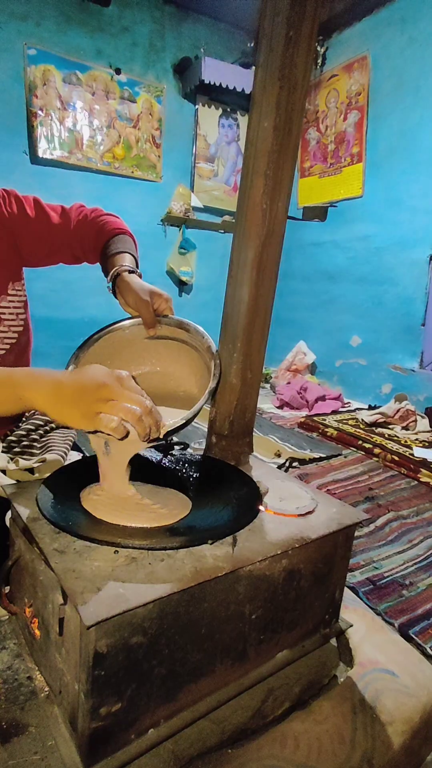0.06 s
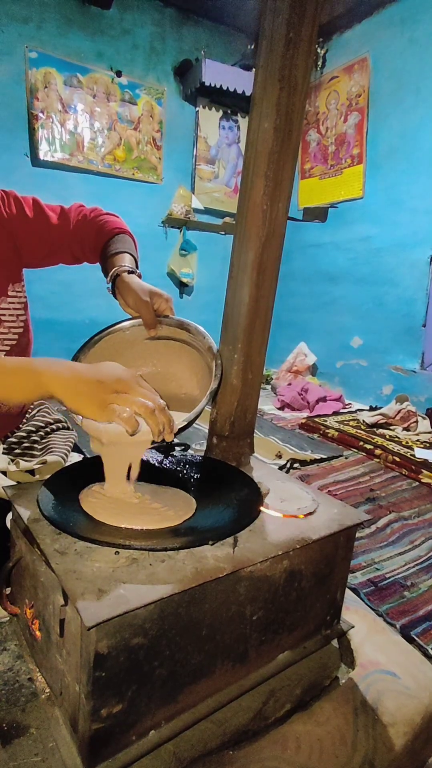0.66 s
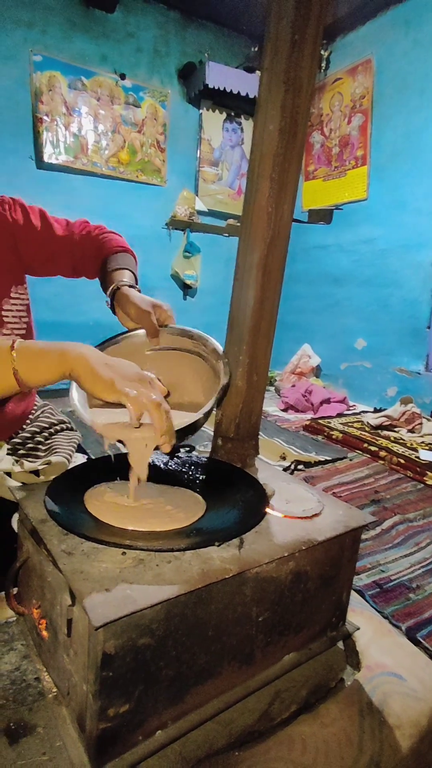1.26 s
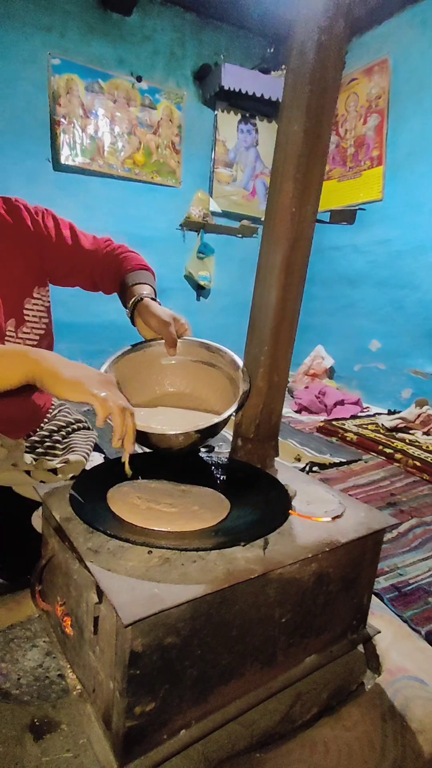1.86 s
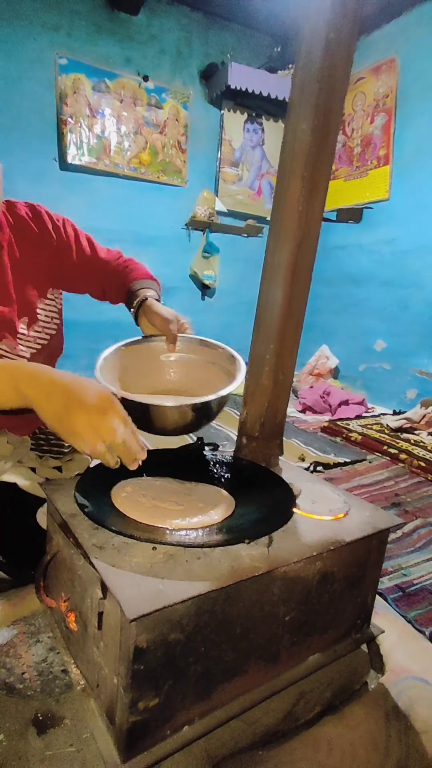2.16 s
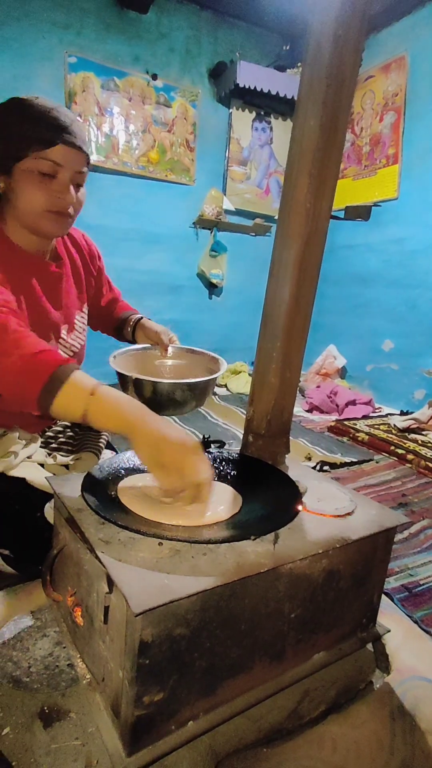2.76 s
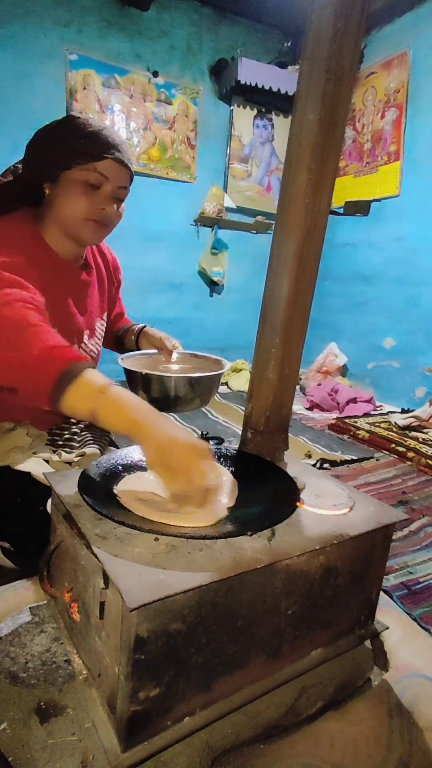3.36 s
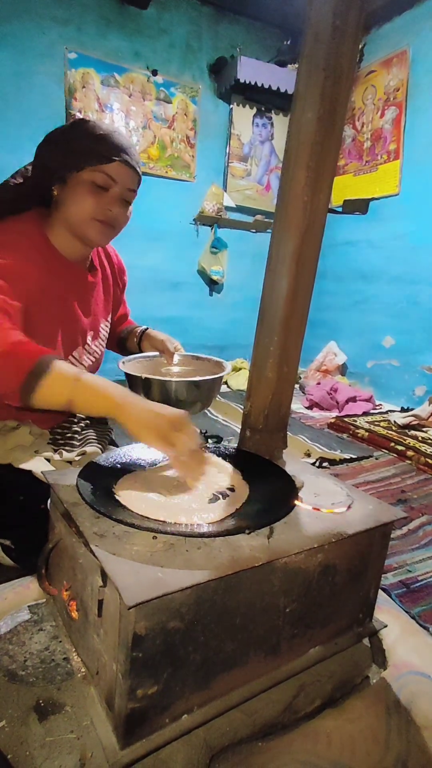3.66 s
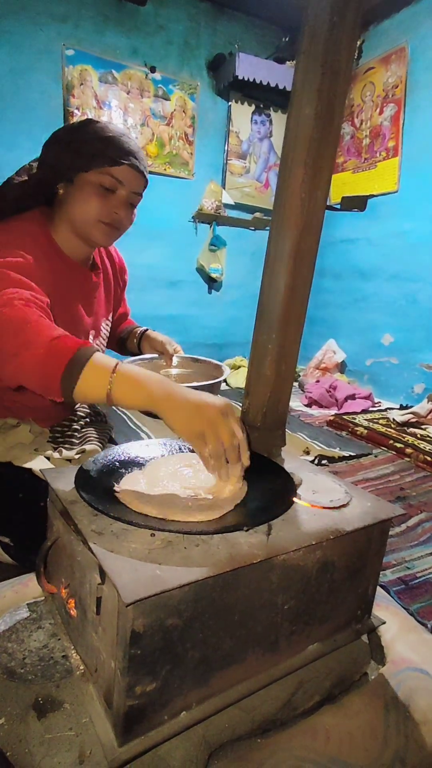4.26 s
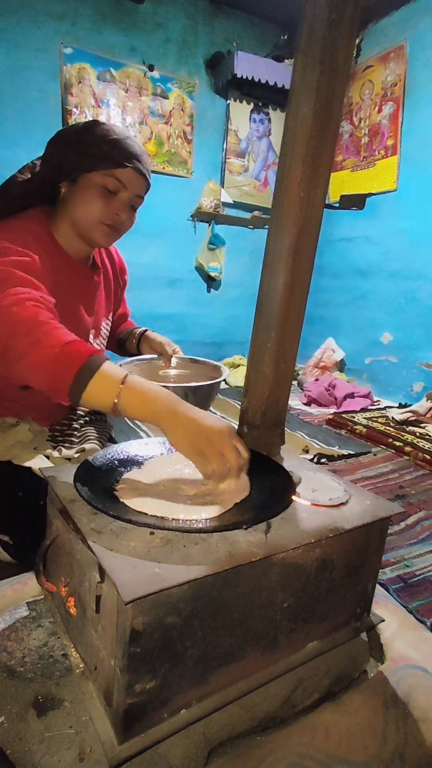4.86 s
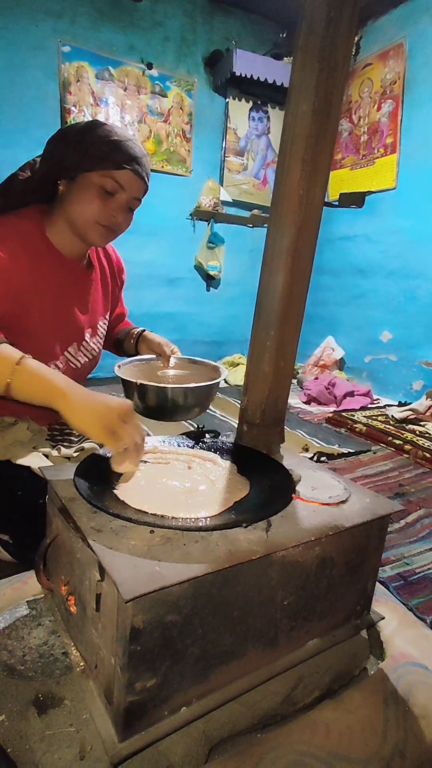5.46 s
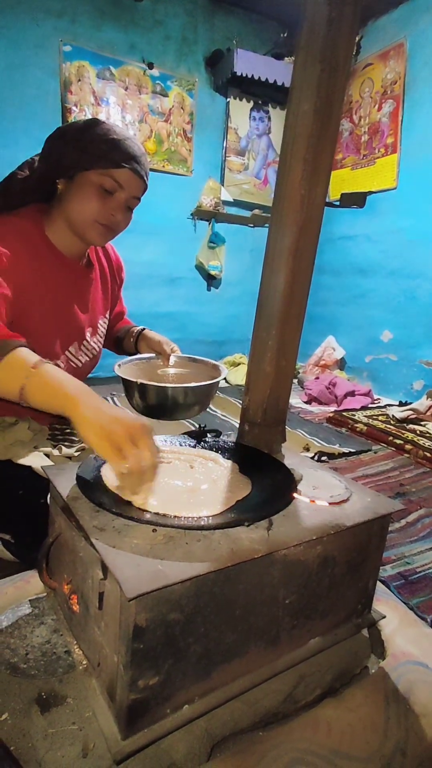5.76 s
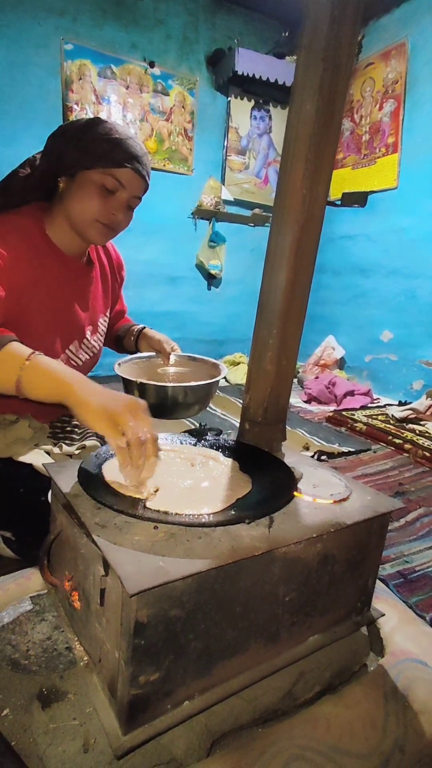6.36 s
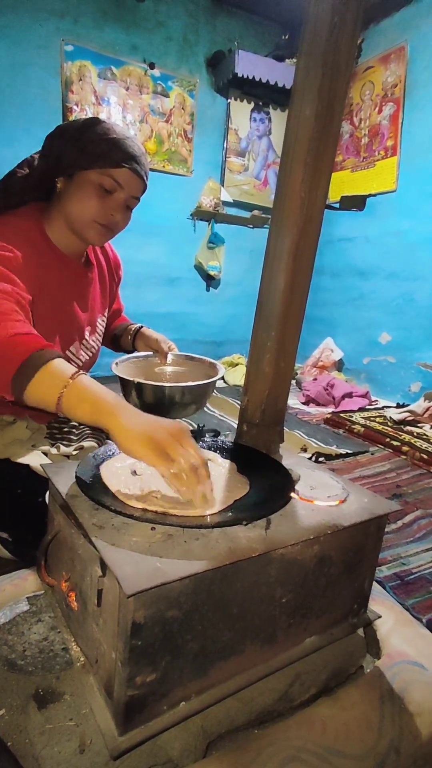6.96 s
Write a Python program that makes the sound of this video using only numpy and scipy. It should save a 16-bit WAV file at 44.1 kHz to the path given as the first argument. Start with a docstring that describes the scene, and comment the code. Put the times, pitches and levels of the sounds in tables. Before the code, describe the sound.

From the start, thin batter sizzles on a hot iron griddle, a dense, fine crackling hiss heard close in stereo in a small kitchen. Underneath and slightly to the right, a wood fire flutters in a box stove throughout, a low rumble with soft, irregular puffs. At about 2.1 seconds a sleeve gives one brief, dull swish and the sizzle dips slightly. From 2.8 seconds fingers spread the batter onto bare iron, and the frying surges, loudest between 3 and 4.5 seconds, with short rasps of escaping steam at each push. Single bubbles spit with tiny sharp cracks, more often after 4.4 seconds. Another smaller surge comes around 5.4 seconds, followed by lighter rasps near 6 seconds. The sizzle then thins and grows quieter until the end at about 7 seconds, while the fire keeps burning. Faint room tone lies behind everything.

```python
"""Thin batter sizzles on a hot iron griddle, close to a stereo pair of microphones in a small kitchen.
Thousands of steam bubbles burst each second; they surge and rasp as the fingers push batter onto
bare iron, and a few spit. Under the griddle, a little to the right, a wood fire flutters and puffs
in a box stove. A sleeve swishes as the bowl is tipped back; faint room tone lies behind it all."""
import sys
import numpy as np
from scipy import signal
from scipy.fft import rfft, irfft, next_fast_len
from scipy.io import wavfile
from scipy.ndimage import map_coordinates

SR = 44100
rng = np.random.default_rng(int(sys.argv[2]) if len(sys.argv) > 2 else 0)


def inscribe(sig):
    """Save sig as 16-bit PCM at rate SR to the path in sys.argv[1].

    A 1-D sig is mono; a 2-D sig holds one channel per row.
    Samples are clipped to [-1, 1] before scaling.
    """
    pcm = np.round(np.clip(np.atleast_2d(sig).T, -1, 1) * 32767)
    wavfile.write(sys.argv[1], SR, pcm.astype(np.int16))


N = 317961

# batter already on the iron, slowly cooking dry:
# (time [s], relative level [dB], big-bubble offset [dB], fine-fizz offset [dB])
COOKING_FILM = [(0.0, -40, -6, -3), (1.9, -40.5, -6.5, -3.5), (2.2, -42.5, -4.0, -3.5),
                (2.78, -43, -7, -3.0), (4.85, -43.5, -4.5, -4.3), (6.1, -43.5, -1.5, -4.0),
                (6.46, -47, 0.2, -5), (7.21, -48.0, -3, -6.5)]
# the hand sweeps batter onto bare iron: (start [s], rise [s], relative peak level [dB],
# time to boil dry [s], big-bubble offset [dB], fine-fizz offset [dB])
BATTER_SWEEPS = [(2.8, 0.21, -37, .15, -5, -2.5), (2.98, 0.092, -39.0, 1.6, -3, -6.5),
                 (3.21, 0.032, -36, 0.09, -15, -5), (3.58, 0.083, -34.5, .48, -7.5, -2.5),
                 (3.88, 0.25, -39, .78, -5, -2), (4.92, 0.077, -46.0, .36, -8, -3),
                 (5.4, 0.048, -40.7, .96, -9.5, -6), (5.46, 0.044, -42.5, .18, -17, 0),
                 (6.21, 0.04, -43.5, 0.18, -17, -2.5), (6.7, 0.081, -49.5, 0.17, -7, -2.5)]
# bursting bubbles at each microphone: (frequency [Hz], left gain [dB], right gain [dB])
BUBBLE_SPECTRUM = [(250, -23, -6), (410, -15, -27.5), (615, -11, -9.5), (830, -12.5, -13.5), (1490, -7, -9),
                   (2560, -9, -5.5), (3400, -6, -6.5), (5020, -2.5, -10), (6490, 0.5, -11), (7700, -17, -9),
                   (10600, -12.5, -14.5), (11900, -11.5, -14), (14900, -11, -12), (15800, -15, -27)]
# resonances of the griddle and stove top: (frequency [Hz], width [Hz], gain [dB])
IRON_MODES = [(523, 26, -3.5), (670, 29, -8), (750.4, 24, 3), (1436, 67, -12), (1633, 130, -8),
              (2220, 220, -5.5), (3940, 82, -4.5), (4420, 240, -10), (5980, 140, -10.5), (11900, 300, -11)]
# steam squeezed from under the fingers: (time [s], spread [s], centre [Hz], level [dB])
FINGER_STROKES = [(3.05, 0.053, 2400, -40), (3.145, .028, 4140, -31.5), (3.225, 0.04, 6100, -34),
                  (3.69, 0.068, 2520, -38.5), (3.84, .02, 5600, -37), (4.25, 0.07, 2620, -39.5),
                  (4.57, 0.069, 2563, -41), (5.465, 0.068, 3300, -41), (5.85, 0.17, 1780, -48.5),
                  (6.05, 0.086, 4170, -44.5), (6.34, .03, 4500, -48)]
# single bubbles that spit: (time [s], relative level [dB], centre [Hz])
SPITTING_BUBBLES = [(.181, -17, 7000), (2.866, -13, 7000), (3.749, -11, 6000), (4.38, -13, 12000),
                    (4.687, -19, 12100), (4.781, -15, 8000), (4.899, -11, 13000), (5.032, -16, 13000),
                    (5.338, -19, 13000), (5.402, -15, 13000), (5.445, -19, 5000), (5.752, -16, 12000),
                    (6.065, -19, 4500), (6.14, -16, 13000), (6.255, -19, 6000), (6.34, -20, 4500),
                    (6.455, -21, 11900), (6.568, -24, 4500), (6.655, -23, 4500), (6.797, -22, 5000),
                    (7.111, -23, 9000)]
# pockets of wood gas that catch: (time [s], relative level [dB])
GAS_PUFFS = [(.12, -26), (.277, -31), (.621, -22), (1.321, -27.5), (1.486, -29), (1.575, -22.5),
             (2.034, -27), (2.091, -23), (2.2, -24), (2.43, -27), (2.635, -25), (3.375, -24),
             (3.897, -24.5), (4.308, -20.5), (4.481, -23.5), (4.6, -23.5), (5.142, -21.5), (5.196, -22.5),
             (5.53, -25), (6.166, -26), (6.55, -25), (6.81, -26)]
# roar of the flames: (frequency [Hz], gain [dB])
FLAME_SPECTRUM = [(10, -9), (22, -9), (36, -26), (55, -7.5), (75, 1), (110, -1), (160, -0.5), (205, -2),
                  (245, -10), (295, -18.5), (370, -26.5), (800, -46), (3000, -70)]
# air modes inside the stove: (frequency [Hz], width [Hz], gain [dB])
FIREBOX_MODES = [(79.7, 6.2, -2), (130, 13, 3.5), (280, 14, -9)]
# rise and fall of the sleeve's swish: (time [s], level [dB])
SLEEVE_LEVEL = [(2.06, -75), (2.09, -53), (2.12, -42), (2.165, -46.5), (2.21, -55), (2.29, -70)]
# rubbing cloth: (frequency [Hz], gain [dB])
CLOTH_SPECTRUM = [(100, -20), (190, 16), (330, 3.5), (530, 9), (800, 1.5), (1050, 8.5), (1500, -10),
                  (3000, -9), (9000, -48)]
# reverberation of the kitchen: (frequency [Hz], time to fall 60 dB [s])
KITCHEN_DECAY = [(200, 0.1), (2000, 0.37), (6000, 0.55), (15000, 0.29)]
# the kitchen's steady air: (frequency [Hz], gain [dB])
ROOM_TONE_SPECTRUM = [(60, 12), (250, -6), (400, -4.5), (530, -9), (750, -7.5), (1100, 3.5), (2000, -16),
                      (6000, -21), (16000, -28)]
# how alike the two microphones hear a sound: (frequency [Hz], correlation [-1 to 1])
MIC_CORRELATION = [(100, 0.99), (250, 0.98), (420, 0.67), (620, 0.85), (950, 0.34), (1550, 0.69),
                   (1900, -0.13), (2200, 0.53), (2800, -0.012), (3800, 0.29), (4600, -0.048), (5600, 0.027),
                   (6800, -0.32), (9000, -0.03)]


def sizzle():
    """Steam bubbles burst in clumps over a hiss: big ones sound low, the finest fizz on top."""
    big_gain, medium_gain, fine_gain = boiling()
    clumps = amp(0.4 * wobble(14) + 0.74 * wobble(90))
    pops = clumps * (bursts(per_second=5200, scatter_db=4.5) + amp(-5.0) * rng.standard_normal((2, N)))
    fry = filtered(stereo(kitchen(pops, wet_db=-3.5)), griddle)
    # the tiniest bubbles prickle on their own, too faint for the walls to answer
    prickle = filtered(clumps * bursts(per_second=4500, scatter_db=5.0), griddle)
    below = lambda hz, edge_hz: 1 / (1 + (hz / edge_hz) ** 8)
    big = unit(filtered(fry, lambda hz: below(hz, edge_hz=2890)))
    medium = unit(filtered(fry, lambda hz: below(hz, edge_hz=7600) - below(hz, edge_hz=2490)))
    fine = unit(filtered(fry + prickle, lambda hz: 1 - below(hz, edge_hz=7050)))
    return big_gain * big + amp(2.0) * medium_gain * medium + amp(4.5) * fine_gain * fine


def boiling(drying_exponent=0.63):
    """Gains of big, medium and fine bubbles: each sweep surges over the film until its water is gone."""
    t = np.arange(N) / SR
    film_db, film_big_db, film_fizz_db = curves(COOKING_FILM)
    power = amp([film_db + film_big_db, film_db, film_db + film_fizz_db]) ** 2
    for start, rise_s, db, dry_s, big_db, fizz_db in BATTER_SWEEPS:
        contact = np.clip((t - start) / rise_s, 0, 1)
        water = np.clip(1 - (t - start - rise_s) / dry_s, 0, 1)
        power += (amp(db) * contact * water ** drying_exponent * amp([[big_db], [0], [fizz_db]])) ** 2
    return np.sqrt(power)


def bursts(per_second, scatter_db):
    """Bubbles pop all over the batter as random clicks of log-normal size, rms 1."""
    popped = rng.random((2, N)) < per_second / SR
    size_db = scatter_db * np.clip(rng.standard_normal((2, N)), -3, 2.6)
    return unit(popped * amp(size_db) * rng.choice([-1, 1], (2, N)))


def griddle(hz, low_cut_hz=120):
    """Colour of a burst on the ringing iron, at the left and right microphone."""
    at_mics = amp([along(BUBBLE_SPECTRUM, hz, column=1), along(BUBBLE_SPECTRUM, hz, column=2)])
    return at_mics * ringing(IRON_MODES, hz) * hz ** 2 / (hz ** 2 + low_cut_hz ** 2)


def strokes():
    """Each push of the fingers traps steam, which escapes as a brief rasp of like-sized bubbles."""
    fry = filtered(stereo(bursts(per_second=6000, scatter_db=4)), griddle)
    t = np.arange(-SR // 2, SR // 2) / SR
    hz = np.fft.rfftfreq(SR, 1 / SR)
    out = np.zeros((2, N))
    for s, spread, centre_hz, db in FINGER_STROKES:
        span = np.round((s + t[0]) * SR).astype(int) + np.arange(SR)
        rasp = unit(irfft(rfft(fry[:, span]) * band(hz, centre_hz, octaves=0.48), SR))
        out[:, span] += amp(db) * np.exp(-.5 * (t / spread) ** 2) * rasp
    return out


def spits(decay_s=0.011):
    """A single bubble tears open with a short crack of steam, the higher the smaller it is."""
    size = SR // 25
    t = np.arange(size) / SR
    hz = np.fft.rfftfreq(size, 1 / SR)
    out = np.zeros((2, N + size))
    for s, db, centre_hz in SPITTING_BUBBLES:
        steam = amp(db - 60 * t / decay_s) * rng.standard_normal((2, size))
        crack = irfft(rfft(steam) * band(hz, centre_hz, octaves=0.9), size)
        start = round(s * SR)
        out[:, start:start + size] += crack * (1 - t / t[-1])
    return filtered(out[:, :N], griddle)


def fire(puff_s=0.0017):
    """Under the griddle, fluttering flames and sudden puffs sound the air in the firebox."""
    firebox = lambda hz: ringing(FIREBOX_MODES, hz)
    flutter = stereo_noise() * amp(0.58 * wobble(22))
    roar = unit(filtered(flutter, lambda hz: amp(along(FLAME_SPECTRUM, hz)) * firebox(hz)))
    # each puff is one smooth dip of pressure between two small crests
    u = np.arange(-SR // 50, SR // 50) / SR / puff_s
    dip = (u * u - 1) * np.exp(-u * u / 2)
    puffs = filtered(signal.fftconvolve(impulses(GAS_PUFFS), dip, "same"), firebox)
    return (flames() * roar + amp(-9) * puffs) * amp([[-.75], [.75]])  # louder at the right microphone


def flames(burn_db=-41, flicker_db=0.4, flare_offset_db=-15, flare_s=0.036):
    """Strength of the fire: a steady, flickering burn that swells round each puff."""
    t = np.arange(N) / SR
    burn = amp(burn_db - flicker_db * wobble(9))
    flares = [amp(db + flare_offset_db) * np.exp(-.5 * ((t - s) / flare_s) ** 2) for s, db in GAS_PUFFS]
    return np.sqrt(burn ** 2 + sum(flare ** 2 for flare in flares))


def sleeve():
    """The cook's sleeve gives one brief, dull swish of cloth."""
    swish_db, = curves(SLEEVE_LEVEL)
    return amp(swish_db) * unit(filtered(stereo_noise(), lambda hz: amp(along(CLOTH_SPECTRUM, hz))))


def kitchen(x, wet_db, tail_count=100):
    """Add the walls' short, diffuse answer; its tail keeps changing as the source moves about."""
    hz, t, noise = signal.stft(rng.standard_normal((tail_count, 2, SR // 7)), SR, nperseg=256)
    decay = amp(-60 * t / along(KITCHEN_DECAY, hz)[:, None])
    _, tails = signal.istft(noise * decay, SR, nperseg=256)
    wet = np.zeros((2, N + SR))
    for tail, part in zip(tails, np.array_split(np.arange(N), tail_count)):
        echo = signal.fftconvolve(x[:, part], tail / np.linalg.norm(tail[0]), axes=1)
        wet[:, part[0]:part[0] + echo.shape[1]] += echo
    return x + amp(wet_db) * wet[:, :N]


def room_tone():
    """The faint, steady air of the kitchen, all round the microphones."""
    return amp(-56.0) * unit(filtered(stereo_noise(), lambda hz: amp(along(ROOM_TONE_SPECTRUM, hz))))


def stereo(pair):
    """Blend two unrelated signals: the bass reaches both microphones alike."""
    angle = lambda hz: np.arccos(np.clip(along(MIC_CORRELATION, hz), -1, 1)) / 2
    mid, side = filtered(pair, lambda hz: np.array([np.cos(angle(hz)), np.sin(angle(hz))]))
    return np.array([mid + side, mid - side])


def stereo_noise():
    """White noise as the pair of microphones hears it."""
    return stereo(rng.standard_normal((2, N)))


def amp(db):
    """Decibels to gain."""
    return 10 ** (np.asarray(db) / 20)


def unit(x):
    """Scale to rms 1."""
    return x / np.sqrt(np.mean(x ** 2) + 1e-20)


def along(points, hz, column=1):
    """One column of a table, interpolated over log frequency."""
    table = np.transpose(points)
    return np.interp(np.log(hz + 1), np.log(table[0] + 1), table[column])


def curves(rows):
    """One value per sample for each column after the time."""
    times, *columns = np.transpose(rows)
    return [np.interp(np.arange(N) / SR, times, column) for column in columns]


def wobble(per_second):
    """A smooth curve through evenly spaced random knots."""
    knots = rng.standard_normal(int(N * per_second / SR) + 4)
    return map_coordinates(knots, [np.arange(N) * per_second / SR])


def filtered(x, response):
    """Multiply the spectrum of x by response(hz)."""
    size = next_fast_len(N + SR // 2)
    return irfft(rfft(x, size) * response(np.fft.rfftfreq(size, 1 / SR)), size)[..., :N]


def band(hz, centre_hz, octaves):
    """A bell-shaped response over log frequency."""
    return np.exp(-.5 * (np.log2((hz + 1) / centre_hz) / octaves) ** 2)


def ringing(modes, hz):
    """Response of a direct path plus resonances."""
    return 1 + sum(amp(db) * 1j * hz * width / (centre ** 2 - hz ** 2 + 1j * hz * width)
                   for centre, width, db in modes)


def impulses(events):
    """One impulse for each row of (time [s], level [dB])."""
    times, db = np.transpose(events)
    return np.bincount(np.round(times * SR).astype(int), amp(db), N)[:N]


def scene():
    """From beside the stove: the griddle, the fire beneath it, the cook's arm and the room."""
    return sizzle() + strokes() + spits() + fire() + sleeve() + room_tone()


def record(dry, top_hz=15800):
    """The microphones keep nothing above their band limit."""
    return filtered(dry, lambda hz: hz < top_hz)


dry = scene()
out = record(dry)
inscribe(out)
```